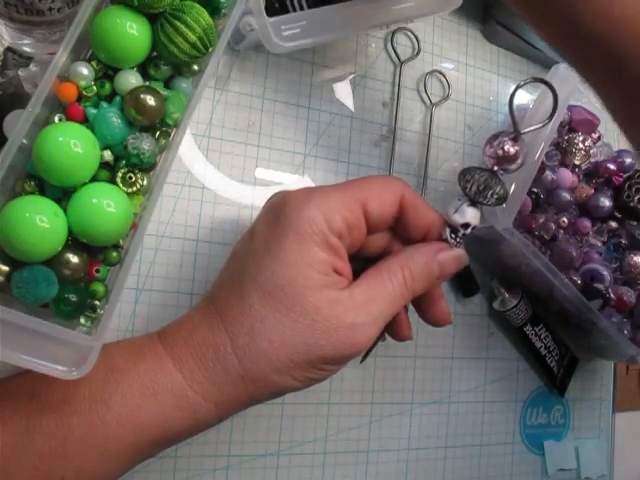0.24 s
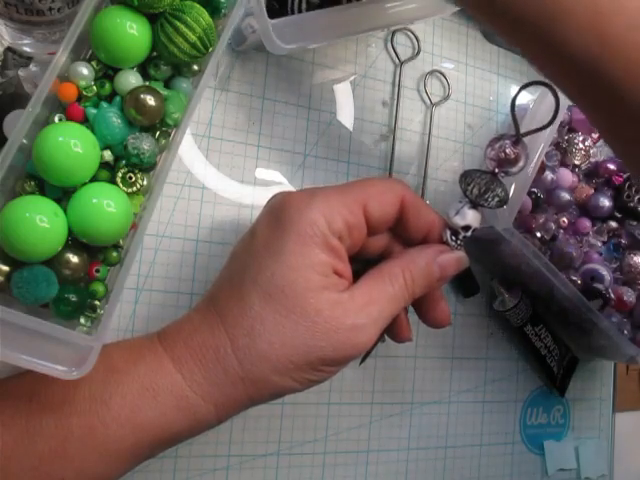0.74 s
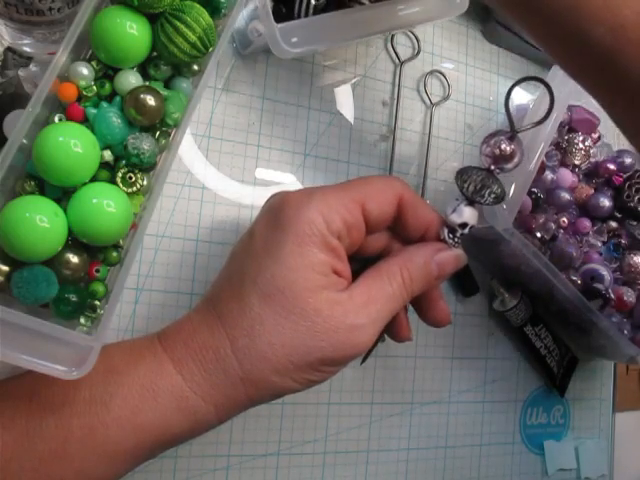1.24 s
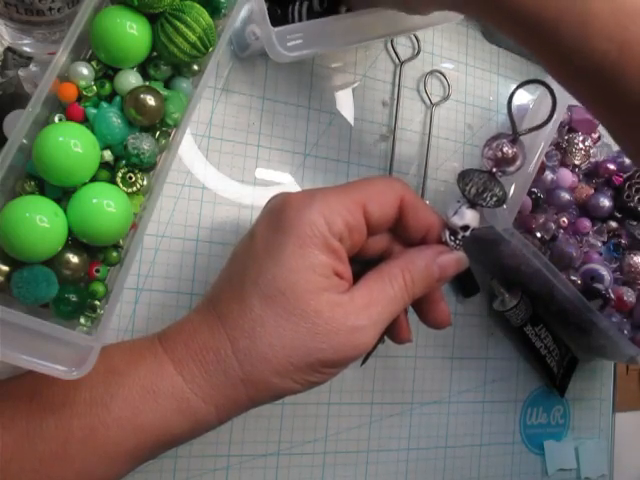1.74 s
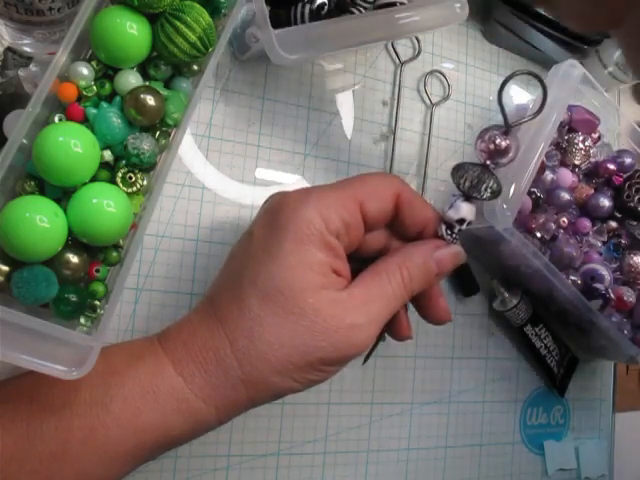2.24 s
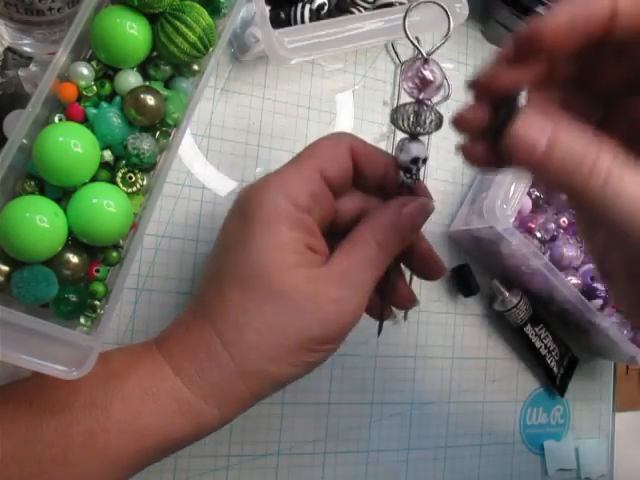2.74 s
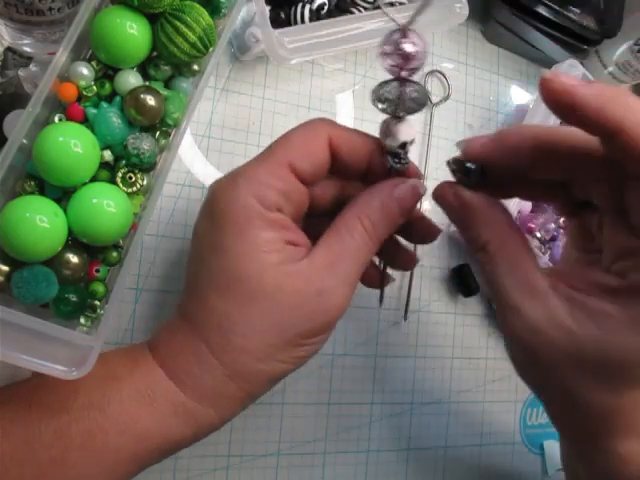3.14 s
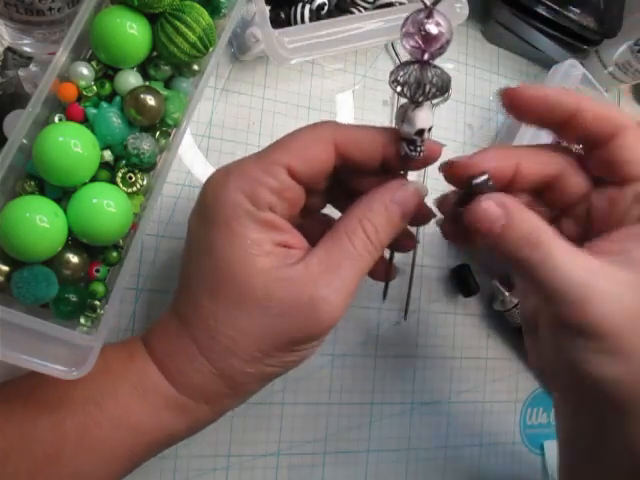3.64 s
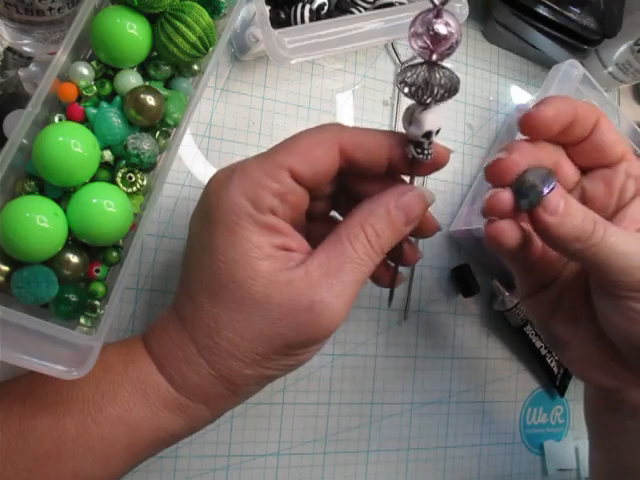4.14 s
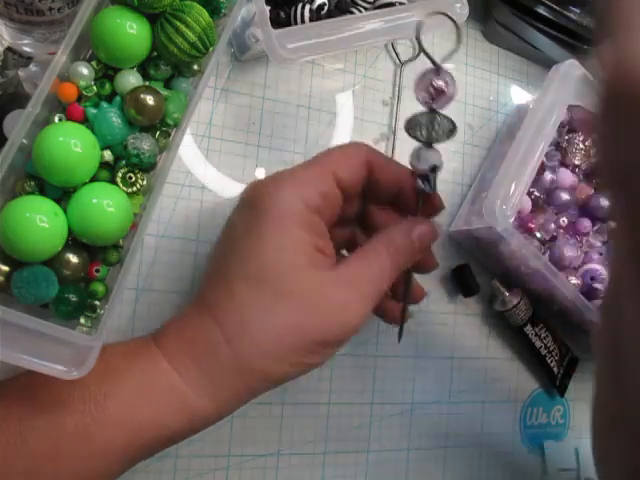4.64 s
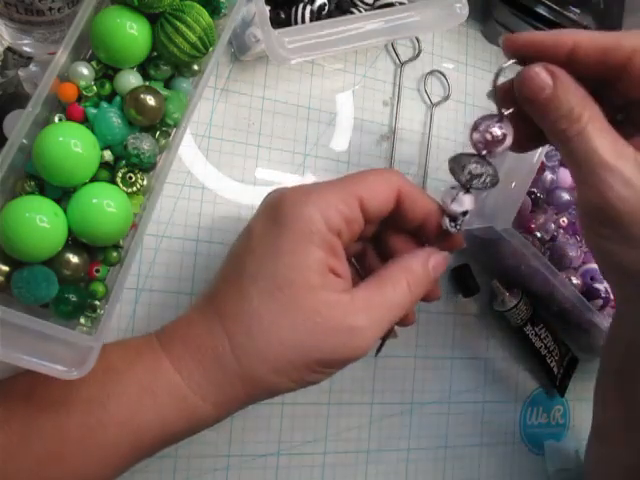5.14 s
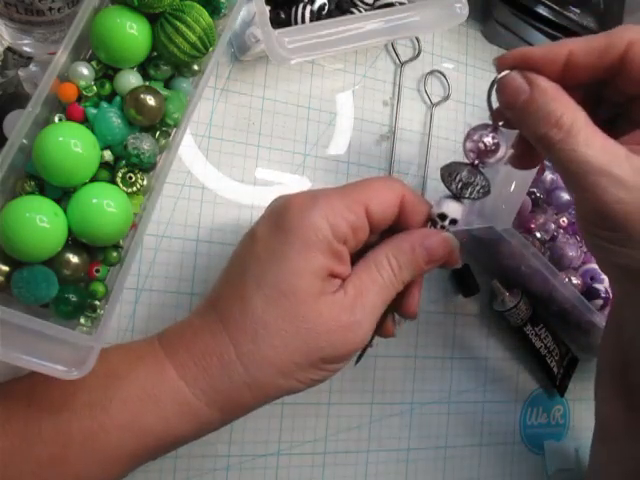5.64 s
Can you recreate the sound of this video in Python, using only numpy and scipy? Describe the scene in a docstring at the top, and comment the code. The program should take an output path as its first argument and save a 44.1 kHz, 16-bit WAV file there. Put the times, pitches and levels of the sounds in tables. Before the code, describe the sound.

From the very start, fingers stir a heap of hard beads in a plastic box, close to the microphone: a dense, bright clatter of irregular clicks, brief rings and hollow wall knocks. It comes in strokes, busy until 0.3 s, swelling again around 0.55-0.85 s, a short burst at 1.15 s, then a looser run from 1.35 s to a hard clack near 1.97 s. The last beads settle by 2.3 s. Then it is nearly quiet: steady faint hiss, thin high whine, low hum and tiny rapid ticks from the camera. A faint slip at 2.4 s, a soft rustle near 2.85 s, small bead taps at 3.2 and 3.4 s, and barely audible ones after. At 4.67 s a bead is tossed back with a loud sharp crack, rattling again from 4.79 to 4.94 s, with soft table thumps. Slight high finger slips follow at 5.25, 5.45 and 5.8 s. The room is small and dry.

```python
"""Fingers stir hard beads in a plastic box on a craft table: cracks, brief rings and wall knocks in a small room.
A camera's hiss, thin whine, mains hum and faint frame-rate ticks run throughout, shaped noise and steady sines.
After two seconds the heap rests; fingers slip on wire and beads, hands rustle, a turned bead taps nail or wire.
The bead is then tossed back and bounces among the rest; pushes of the box thump the table in both flurries.
Last come a few more slips, short bursts of high noise."""
import sys
import numpy as np
from scipy import signal
from scipy.fft import rfft, irfft, next_fast_len
from scipy.io import wavfile

SR = 44100
rng = np.random.default_rng(int(sys.argv[2]) if len(sys.argv) > 2 else 0)


def to_wav(sig):
    """Store sig (one row per channel, or 1-D mono) as 16-bit WAV at the path in sys.argv[1].

    Samples outside -1..1 are clipped; the rate is SR.
    """
    pcm = np.clip(np.atleast_2d(sig), -1, 1) * 32767
    pcm = np.round(pcm).astype(np.int16)
    wavfile.write(sys.argv[1], SR, pcm.T)  # frames by channels


N = 259737

# Hiss colour: f/Hz, relative level/dB
HISS_COLOUR = [(25, -11), (60, -12), (124, -7.5), (350, -6), (690, -9.5), (4600, -12.5), (9300, -11),
               (11000, -11), (12300, -5.5), (15500, 0.5), (16500, -15.5)]
# Steady hum and whine going into the microphone: f/Hz, rms level/dB
HUM_AND_WHINE = [(119.9, -83.5), (5880, -57.5), (8484, -85), (9157, -77.5)]
# Resonances of a frame tick, passed twice: f/Hz, width/Hz, weight/dB
TICK_MODES = [(4800, 1400, 2), (6200, 220, -1.5), (7380, 2300, 3)]
# The heap shifting, one curve a stroke: t/s, level/dB, wall share/dB
STROKES = [
    [(0.0, -25.5, -1.5), (0.082, -39, 0.5), (0.12, -36.5, 0), (0.244, -43, 2.5), (0.275, -50.5, 5),
     (0.3, -52, -5)],
    [(0.306, -49, 0), (0.36, -39, 3.5), (0.428, -40.5, 0.5), (0.51, -38, 5), (0.58, -30, -2),
     (0.67, -35, 3), (0.728, -27, 1.5), (0.8, -29.5, -1.5), (0.85, -29, -7.5), (0.91, -50, -7.5)],
    [(0.916, -52, 1), (1.0, -43.5, -0.5), (1.04, -31.5, -1.5), (1.104, -41.5, 6), (1.14, -38.5, 2),
     (1.19, -38, 4.5), (1.3, -50.5, 3.5)],
    [(1.306, -55.5, 3), (1.35, -37, -1.5), (1.395, -41.5, -4.5), (1.474, -31, -6.5), (1.54, -33, 0),
     (1.59, -39, -4.5), (1.66, -36, 2), (1.73, -37.5, 5.5), (1.78, -39, -5), (1.874, -34, 2),
     (1.94, -34.5, -1), (2.0, -32, -2.5), (2.056, -42.5, 3), (2.13, -70.5, -2)],
    [(4.677, -51.5, -8), (4.713, -43, -15), (4.78, -47, -0.5), (4.8, -42, -5), (4.86, -35, 2),
     (4.9, -62, -3), (4.94, -72, 7), (4.99, -80, 10)],
]
# Collisions that stand out: t/s, level/dB, bead pitch f/Hz, wall knock relative to the blow/dB
COLLISIONS = [(0.0054, -13.5, 6830, -6.5), (0.0135, -18.5, 3850, -4), (0.0327, -15, 7440, -19),
              (0.05, -19.5, 5250, -6.5), (0.0588, -15.5, 3660, -19), (0.065, -19, 4460, -10),
              (0.07, -24, 2050, -8), (0.109, -19, 4120, -10), (0.1247, -18.5, 3250, -19),
              (0.1466, -17.5, 4400, -5), (0.1589, -14.5, 4450, -10), (0.1635, -10.5, 6510, -10.5),
              (0.175, -25.5, 3130, -12), (0.1926, -14, 7400, -5), (0.209, -18.5, 3540, -10),
              (0.2217, -20.5, 2110, -14), (0.2316, -17.5, 3640, -17), (0.249, -19.5, 4430, -10),
              (0.261, -16.5, 6460, -5.5), (0.3392, -17, 4450, 0), (0.3475, -11.5, 6430, -14),
              (0.3531, -13, 7330, -18), (0.3686, -23, 3750, -1), (0.3845, -13.5, 7360, -11),
              (0.4066, -16.5, 7300, -6), (0.451, -26, 4560, -8), (0.4671, -21, 6740, -3),
              (0.526, -19, 7100, -6.5), (0.5411, -18.5, 6400, -8), (0.5475, -18.5, 5160, -4),
              (0.5566, -19.5, 4365, -5), (0.5712, -16.5, 5280, -5.5), (0.5746, -6.5, 7180, -15.5),
              (0.5865, -15, 3900, 3.5), (0.5978, -10, 5210, -5.5), (0.6223, -17.5, 1760, -15),
              (0.6333, -14.5, 1810, -3), (0.64, -7, 6670, -8), (0.651, -18.5, 4160, -16.5),
              (0.7008, -23, 1780, -0.5), (0.73, -20, 7230, -21), (0.7403, -20.5, 4440, -6.5),
              (0.7507, -18, 3140, -9.5), (0.7546, -11.5, 8200, -10), (0.7593, -7, 4870, -9.5),
              (0.7664, -13, 3580, -13), (0.7743, -12.5, 3500, 0), (0.7826, -8, 7200, -25.5),
              (0.7974, -20.5, 6500, 1), (0.8076, -21.5, 3600, -2), (0.8231, -21, 2000, -3.5),
              (0.832, -13.5, 7150, -3), (0.8441, -16.5, 4530, -5.5), (0.8518, -18, 2000, -21),
              (0.8643, -22, 7200, -2.5), (0.8889, -28, 8760, -11), (0.922, -22, 4900, -33),
              (0.973, -32, 6900, 2.5), (0.9904, -33, 4970, -7.5), (1.0154, -27.5, 1830, 0),
              (1.0321, -15, 4430, -5), (1.0415, -16, 4240, -6), (1.0943, -19.5, 6800, -2),
              (1.1168, -13.5, 6800, -5.5), (1.1538, -13.5, 7000, 7), (1.159, -7, 4430, -7.5),
              (1.1716, -11, 5160, -10.5), (1.186, -10, 7100, -14.5), (1.1919, -13, 4230, -18),
              (1.2028, -23, 1910, -18), (1.2247, -14.5, 4170, -24), (1.2308, -25.5, 4300, -25),
              (1.2343, -17, 2920, -29), (1.2451, -24.5, 4280, -6), (1.2631, -21, 6930, -5),
              (1.2735, -20, 4270, -7.5), (1.3333, -22, 4250, -13.5), (1.356, -31, 2000, -13),
              (1.407, -17.5, 7020, -6.5), (1.4172, -17.5, 4140, -14), (1.428, -17.5, 3500, -6),
              (1.4542, -22, 4260, -7.5), (1.469, -26, 1760, 3), (1.5161, -18.5, 4500, -13),
              (1.5235, -17, 4250, 4), (1.5309, -14.5, 4660, -22), (1.5402, -16, 6820, -0.5),
              (1.5629, -28, 4400, -14.5), (1.598, -24.5, 3260, -5), (1.614, -19, 3600, -0.5),
              (1.6681, -21.5, 3200, 1), (1.687, -22, 3280, -1), (1.7065, -15.5, 2760, -11),
              (1.7193, -19, 3570, -15), (1.7307, -17, 4300, -18), (1.7404, -21, 4450, -5.5),
              (1.7752, -26.5, 2100, -22), (1.846, -19.5, 1890, -15), (1.8859, -12.5, 6500, -26),
              (1.8921, -15, 4470, -7), (1.9052, -17.5, 3980, -15), (1.9106, -16.5, 3260, -6.5),
              (1.925, -16, 4460, -11), (1.9336, -16, 4400, -11), (1.9593, -11, 5100, -3.5),
              (1.9716, -19, 2040, 4.5), (1.9741, -3, 6920, -18.5), (1.995, -16.5, 3580, -1),
              (2.023, -9, 4700, -4.5), (2.0322, -18.5, 4150, -5), (2.046, -12, 4310, -5.5),
              (2.0608, -24, 2020, -16), (2.0685, -22.5, 7100, -5), (2.0943, -35, 7640, -0.5),
              (2.159, -32, 1500, -11), (2.192, -26.5, 3480, -11), (2.248, -31.5, 2680, -9),
              (2.309, -44.5, 2830, 2), (4.6744, -5, 4040, -4.5), (4.678, 0.5, 6790, -13),
              (4.682, -13.5, 6700, -9), (4.698, -16.5, 3430, -10), (4.705, -20, 3680, -9),
              (4.7215, -33, 2800, -13), (4.7545, -39, 3660, -13), (4.788, -4, 7030, -4.5),
              (4.7926, -7.5, 5840, -7), (4.7966, -19, 4300, -25), (4.8091, -17.5, 1940, -27),
              (4.8386, -7.5, 6700, -5.5), (4.85, -21.5, 3570, -5), (4.862, -12, 6970, -5.5),
              (4.8701, -12, 5250, -5), (4.8764, -21.5, 3460, -4), (4.8839, -19.5, 6920, -5.5),
              (4.9214, -12, 3640, -5), (4.9366, -28, 1500, -10)]
# Resonances of the box wall: f/Hz, width/Hz, weight/dB
WALL_MODES = [(354, 130, -13.5), (595, 267, -8.5), (908, 200, -1.5), (1268, 120, 1), (1864, 720, -3),
              (2290, 490, -5.5)]
# Colour of the contact crack: f/Hz, gain/dB
CRACK_COLOUR = [(700, -39.5), (1500, -13), (3000, -7), (5000, -2.5), (7300, -0.5), (11000, -6),
                (16000, -4.5)]
# Decay of the room: f/Hz, t60/s
ROOM_DECAY = [(300, 0.16), (1500, 0.18), (5000, 0.14), (14000, 0.04)]
# Pushes of the box against the table: t/s, level/dB
PUSHES = [(0.009, -54), (0.598, -64), (0.718, -60), (1.556, -49.5), (1.973, -43.5), (4.674, -39.5),
          (4.789, -48.5)]
# Fingers slipping on wire and beads: t/s, level/dB, lower edge f/Hz, t60/s
FINGER_SLIPS = [(2.37, -50, 4550, 0.27), (3.385, -45, 9350, 0.11), (5.25, -64, 9800, 0.42),
                (5.445, -50, 7160, 0.18), (5.826, -60, 10170, 0.21)]
# Resonances colouring the rustle: f/Hz, width/Hz, weight/dB
RUSTLE_MODES = [(5000, 900, 0), (8960, 2300, 0)]
# A bead turned in the fingers taps nail or wire: t/s, level/dB, pitch f/Hz, crack relative to the tap/dB
BEAD_TAPS = [(3.2026, -30.5, 7770, -20.5), (3.3735, -54, 5530, -5), (3.379, -25.5, 8230, -28),
             (3.385, -38.5, 8700, -9), (3.536, -50, 3000, -5), (3.788, -45.5, 1600, -16),
             (4.09, -48, 4020, -8), (4.6, -51, 9000, -9)]
# Microphone response: f/Hz, gain/dB
MIC_RESPONSE = [(20, -19), (100, 7.5), (7500, -3), (10600, -8), (11400, -15.5), (11780, -38), (12200, -20),
                (13500, -22), (15300, -27.5), (16500, -40.5)]

FRAME_HZ, FIRST_FRAME_S = 30, 0.0118
STIR_COUNT = 3500
# The crack of a blow grows faster than the blow: dB per dB, about a hard blow's level, plus a lift in dB
CRACK_GROWS, HARD_DB, CRACK_DB = 1.25, -11.5, 3
ROOM_DB = -15.5
RUSTLE_S, RUSTLE_LENGTH_S, RUSTLE_DB = 2.85, 0.1, -65
CEILING = 0.8  # amplitude the rounded peaks approach, before the band limit
TOP_HZ = 16600


def amp(db):
    """Amplitude factor of a level in dB."""
    return 10 ** (np.asarray(db) / 20)


def unit(x):
    """x scaled to an rms of one."""
    return x / np.sqrt(np.mean(x ** 2) + 1e-20)


def along(points, hz):
    """Reads a curve of (f/Hz, value) points on a log frequency axis."""
    f, value = np.transpose(points)
    return np.interp(np.log(hz + 1), np.log(f + 1), value)


def filtered(x, response):
    """x times a complex response of frequency, along the last axis."""
    size = next_fast_len(x.shape[-1] + SR // 8)
    spectrum = rfft(x, size) * response(np.fft.rfftfreq(size, 1 / SR))
    return irfft(spectrum, size)[..., :x.shape[-1]]


def modes(table):
    """Causal response of a bank of resonances, added with alternating signs."""
    def response(f):
        total = 0
        for k, (centre, width, db) in enumerate(table):
            damping = 1j * f * width
            total = total + (-1) ** k * amp(db) * damping / (centre * centre - f * f + damping)
        return total
    return response


def place(times, rows):
    """Sums one short sound per row at its time."""
    at = np.round(times * SR).astype(int)[:, None] + np.arange(rows.shape[1])
    return np.bincount(at.ravel(), rows.ravel(), N + SR)[:N]


def camera():
    """Coloured noise hisses, steady sines hum and whine, a resonant noise burst ticks at every frame."""
    t = np.arange(N) / SR
    noise = filtered(rng.standard_normal(N), lambda hz: amp(along(HISS_COLOUR, hz)))
    hiss = amp(-58.5) * unit(noise)
    tones = sum(np.sqrt(2) * amp(db) * np.sin(2 * np.pi * hz * t) for hz, db in HUM_AND_WHINE)
    frames = np.arange(FIRST_FRAME_S, N / SR, 1 / FRAME_HZ)
    tick_level = amp(-57 + 1.5 * rng.standard_normal((len(frames), 1)))
    bursts = rng.standard_normal((len(frames), 160)) * tick_level * np.hanning(160)
    ticks = filtered(place(frames, bursts), lambda hz: modes(TICK_MODES)(hz) ** 2)
    return hiss + tones + ticks


def collide(times, pitch_hz, ring_db, knock_db, crack_db, crack_t60, ring_t60):
    """Beads meet: the contact chatters for a moment, the beads ring briefly, the wall takes the blow."""
    t = np.arange(SR // 100) / SR
    rise = 1 - np.exp(-t / 0.00027)
    chatter = np.sign(rng.standard_normal((len(times), 2, len(t)))) * rise

    neighbours = np.exp(rng.normal(0, 0.399, (len(times), 4)))  # touching beads of other sizes join in
    ratios = np.column_stack([np.ones(len(times)), neighbours])[..., None]
    carrier = np.sin(2 * np.pi * pitch_hz[:, None, None] * ratios * t)
    together = carrier[:, 0] + 0.66 * carrier[:, 1:].sum(axis=1)
    ring = together * rise * amp(ring_db[:, None] - 60 * t / ring_t60)

    crack = chatter[:, 0] * amp(crack_db[:, None] - 60 * t / crack_t60)
    blow = chatter[:, 1] * amp(knock_db[:, None] - 60 * t / 0.014)
    bright = filtered(place(times, crack), lambda hz: amp(along(CRACK_COLOUR, hz)))
    body = place(times, ring) + filtered(place(times, blow), modes(WALL_MODES))
    # small things radiate no bass
    return bright + filtered(body, lambda hz: 1 / (1 + 380 / (1j * hz + 1)) ** 3)


def stirring(s):
    """Level of the shifting heap and of its wall knocks at times s; silent between strokes."""
    silent_db = -120
    rows = []
    for stroke in STROKES:
        before = (stroke[0][0] - 0.002, silent_db, 0)
        after = (stroke[-1][0] + 0.002, silent_db, 0)
        rows.append([before, *stroke, after])
    when, db, wall_db = np.transpose(np.concatenate(rows))
    return np.interp(s, when, db), np.interp(s, when, db + wall_db)


def stir():
    """Many small collisions, at random moments and sizes, while the heap shifts."""
    chance = rng.random((STIR_COUNT, 4))
    s = chance[:, 0] * N / SR
    heap_db, wall_db = stirring(s)
    size_db = -4.2 * np.log(chance[:, 1] + 0.02)  # most are slight, a few are hard
    pitch_hz = 2200 * 3.6 ** chance[:, 2]
    blow_db = heap_db + size_db
    knock_db = wall_db + size_db + 8 * (chance[:, 3] - 0.5) + 5.5
    return collide(s, pitch_hz, blow_db - 0.5, knock_db, blow_db - 2.0, crack_t60=0.019, ring_t60=0.0075)


def crack_of(db):
    """Level of the crack of a blow: harder blows crack more than in proportion."""
    return HARD_DB + CRACK_GROWS * (db - HARD_DB) + CRACK_DB


def clacks():
    """The collisions that stand out, each with crack, ring and wall knock."""
    s, db, hz, knock_db = np.transpose(COLLISIONS)
    return collide(s, hz, db - 2, db + knock_db + 11, crack_of(db), crack_t60=0.013, ring_t60=0.011)


def jostle():
    """A hard collision is no single contact: three neighbouring contacts follow just after it."""
    s, db, hz, knock_db = np.repeat(np.transpose(COLLISIONS), 3, axis=1)
    chance = rng.standard_normal((len(s), 3))
    level_db = 0.66 * db + 0.3 * stirring(s)[0] + 2.0 * chance[:, 0]
    lag = 0.0005 + 0.005 * np.abs(chance[:, 1])
    pitch_hz = hz * np.exp(0.3 * chance[:, 2])
    wall_db = level_db + knock_db + 8.5
    return collide(s + lag, pitch_hz, level_db - 8.5, wall_db, level_db - 1.0, crack_t60=0.014, ring_t60=0.014)


def room(x):
    """Each frequency of the answer dies at its own speed; a fresh noise tail every tenth of a second."""
    step, delay = SR // 10, 60  # samples
    out = np.zeros(N + SR)
    for start in range(0, N, step):
        hz, t, grains = signal.stft(rng.standard_normal(SR // 4), SR, nperseg=128)
        decay = amp(-60 * t / along(ROOM_DECAY, hz)[:, None])
        tail = signal.istft(grains * decay, SR, nperseg=128)[1]
        wet = signal.fftconvolve(x[start:start + step], tail / np.linalg.norm(tail))
        out[start + delay:][:len(wet)] += wet
    return out[:N]


def thumps():
    """One low push through the table: a pulse that swings back and dies within milliseconds."""
    s, db = np.transpose(PUSHES)
    u = np.arange(SR // 20) / SR / 0.0006  # time in units of 0.6 ms
    pulse = u * (2.3 - u) * np.exp(-u)
    push = place(s, amp(db[:, None] + 11.0) * pulse)
    return filtered(push, lambda hz: 1 / (1 + 70 / (1j * hz + 1)))  # thins the deepest bass


def slips():
    """Friction noise that starts at once and decays, strongest at its lower edge."""
    out, t = np.zeros(N + SR), np.arange(SR // 4) / SR
    for s, db, edge_hz, t60 in FINGER_SLIPS:
        def colour(f):
            above = (f > edge_hz) * (f < 11500)
            return modes([(edge_hz, 400, 0)])(f) ** 2 + 0.3 * above
        noise = unit(filtered(rng.standard_normal(len(t)), colour))
        rise = 1 - np.exp(-t / 0.0017)
        out[round(s * SR):][:len(t)] += amp(db - 60 * t / t60) * noise * rise
    return out[:N]


def rustle():
    """A faint high rustle: resonant noise swells and fades as the hands move."""
    noise = filtered(rng.standard_normal(N), modes(RUSTLE_MODES))
    swell = np.exp(-0.5 * ((np.arange(N) / SR - RUSTLE_S) / RUSTLE_LENGTH_S) ** 2)
    return amp(RUSTLE_DB) * unit(noise) * swell


def taps():
    """Contacts away from the box: ring and crack, with the wall knock all but silent."""
    s, db, hz, crack_db = np.transpose(BEAD_TAPS)
    no_wall_db = np.full(len(s), -120)
    return collide(s, hz, db, no_wall_db, db + crack_db + 14.0, crack_t60=0.017, ring_t60=0.01)


def scene():
    """Beads and their room answer, with the table, fingers, hands and camera laid in dry."""
    beads = clacks() + jostle() + stir() + taps()
    answer = amp(ROOM_DB) * room(beads)
    mix = beads + answer + thumps() + slips() + rustle() + camera()
    return mix[None]


def record(dry):
    """The microphone dulls the treble, with a narrow dead spot; the input rounds hard peaks; a band limit ends."""
    heard = filtered(dry, lambda hz: amp(along(MIC_RESPONSE, hz)))
    rounded = heard / (1 + np.abs(heard / CEILING) ** 4) ** (1 / 4)
    return filtered(rounded, lambda hz: hz < TOP_HZ)


dry = scene()
out = record(dry)
to_wav(out)
```